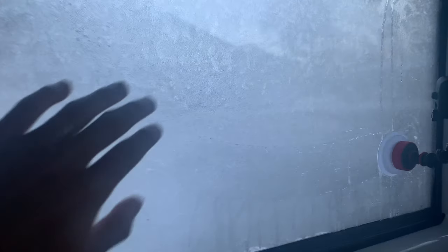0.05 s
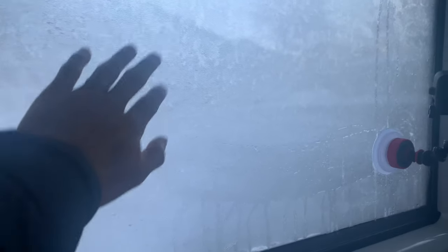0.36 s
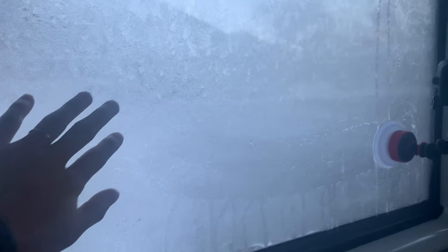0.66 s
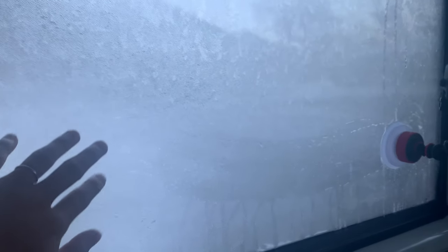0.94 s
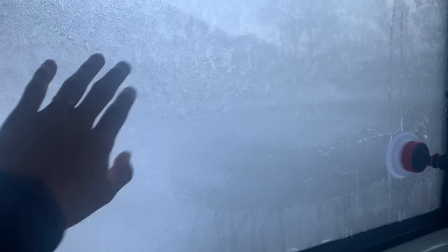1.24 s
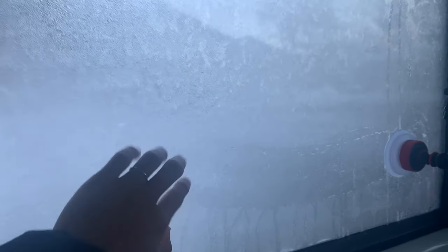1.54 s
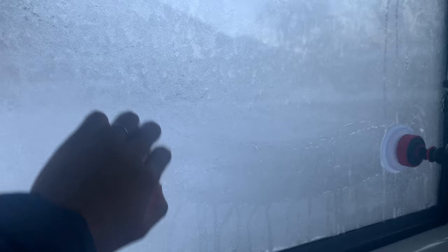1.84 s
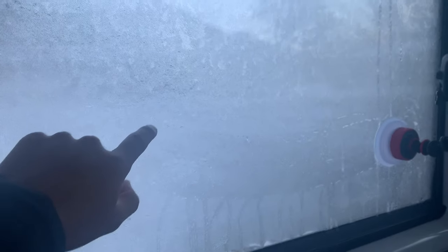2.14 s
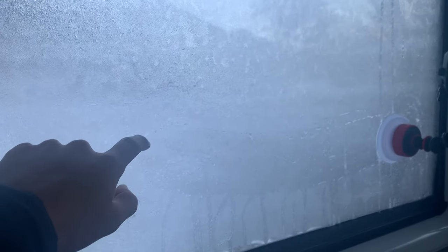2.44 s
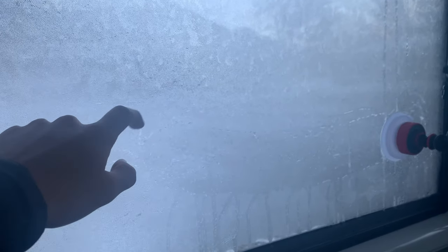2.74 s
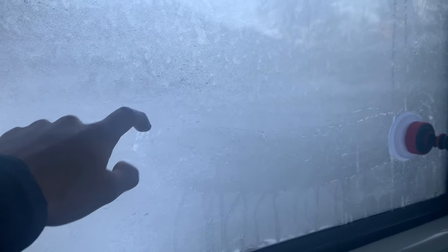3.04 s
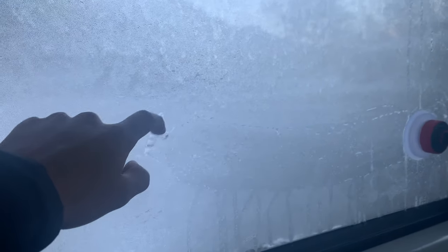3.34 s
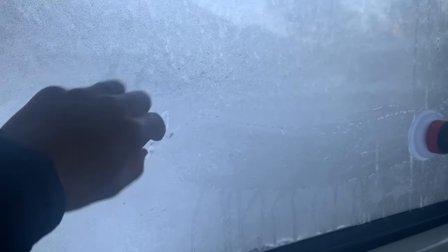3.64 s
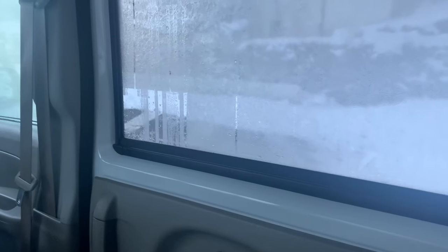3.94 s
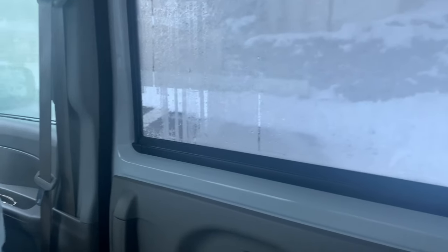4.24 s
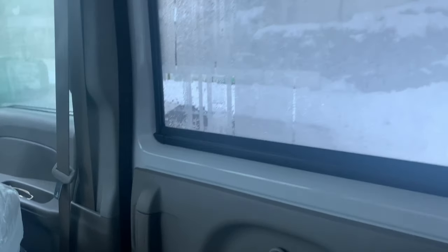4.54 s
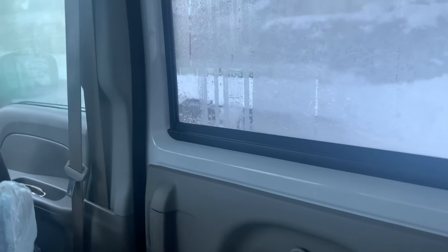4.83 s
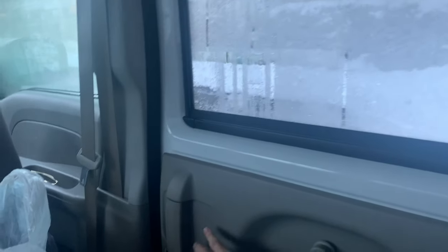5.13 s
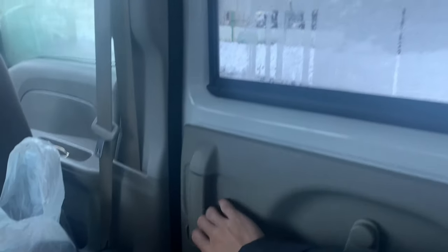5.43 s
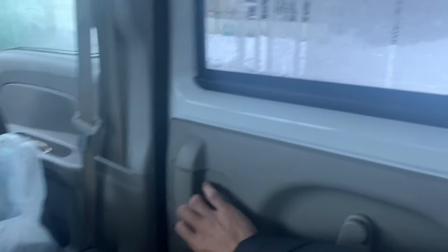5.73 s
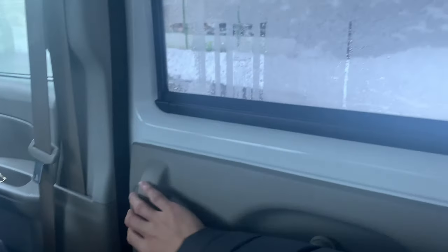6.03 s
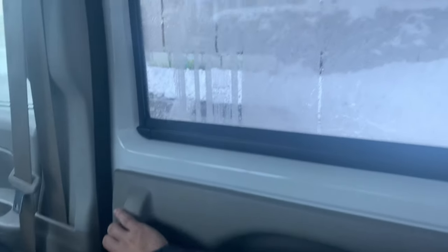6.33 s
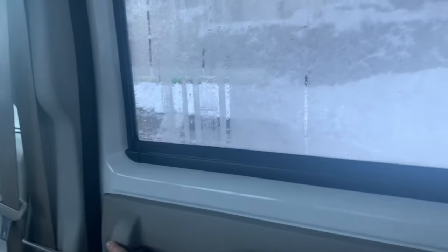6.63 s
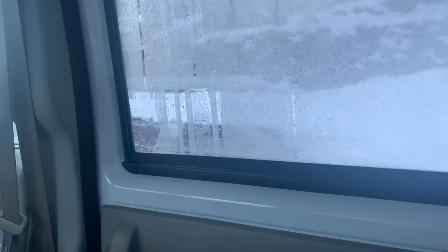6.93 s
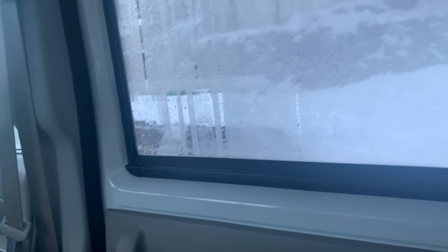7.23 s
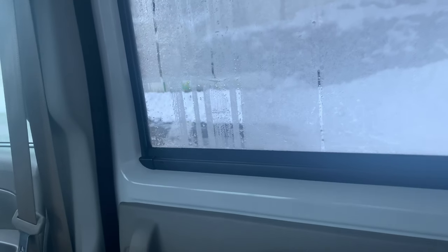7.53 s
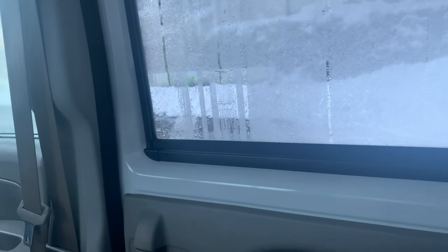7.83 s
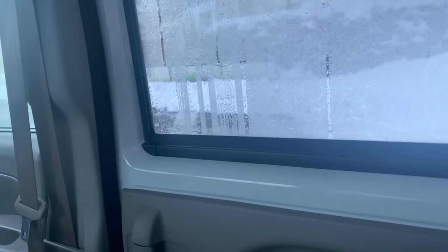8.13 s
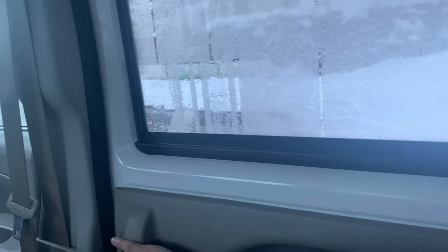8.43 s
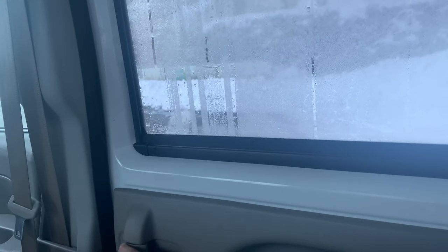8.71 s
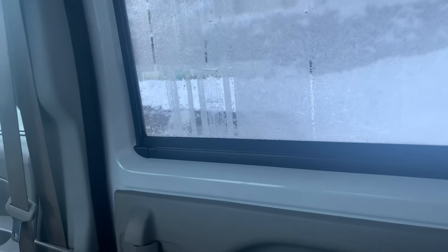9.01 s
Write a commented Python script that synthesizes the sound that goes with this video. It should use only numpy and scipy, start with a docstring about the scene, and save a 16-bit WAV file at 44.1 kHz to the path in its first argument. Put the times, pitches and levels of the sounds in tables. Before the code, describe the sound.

A hand rubs and scratches a frosted van window, a sleeve swishes, then a latch clicks and the sliding door thumps open.

```python
"""A faint sleeve swish, then a hand pats, rubs and knocks the frosted side window inside a parked van.
A fingernail scratches the ice; the breaking crystals ring the pane. The nylon sleeve swishes again as
the arm moves to the door, and fingers drag over the trim and fumble with the lock and handle.
The latch lets go; the sliding door pops out of its seal, booms in the cabin air and starts to roll."""
import sys
import numpy as np
from scipy import signal
from scipy.fft import rfft, irfft, next_fast_len
from scipy.io import wavfile
from scipy.ndimage import uniform_filter1d

SR = 44100
rng = np.random.default_rng(int(sys.argv[2]) if len(sys.argv) > 2 else 0)


def output_pcm(signal):
    """Save a mono or channel-first signal as 16-bit PCM at the path in sys.argv[1].

    Samples are clipped to [-1, 1] before scaling.
    """
    pcm = np.clip(np.atleast_2d(signal).T, -1, 1) * 32767
    wavfile.write(sys.argv[1], SR, np.round(pcm).astype(np.int16))


N = 408807
TIME_S = np.arange(N) / SR
RING_S = TIME_S[:SR // 2]
IMPULSE_GAIN = np.sqrt(SR / 50)  # unit energy to rms 1 over 20 ms


def undb(db):
    """Decibels to gain."""
    return 10 ** (np.asarray(db) / 20)


def unit_rms(x):
    """Scale to rms 1."""
    return x / np.sqrt(np.mean(x ** 2) + 1e-30)


def unit_energy(x):
    """Scale to energy 1."""
    return x / np.sqrt(np.sum(x ** 2) + 1e-30)


def band(x, lo_hz, hi_hz):
    """Causal band-pass."""
    sos = signal.butter(3, [lo_hz, min(hi_hz, SR / 2 - 1)], "band", fs=SR, output="sos")
    return signal.sosfilt(sos, x)


def colour(x, spectrum):
    """Filter by (frequency [Hz], gain [dB]) points."""
    hz, db = np.transpose(spectrum)
    size = next_fast_len(len(x))
    bins_hz = np.maximum(np.arange(size // 2 + 1) * SR / size, 1)
    gain = undb(np.interp(np.log(bins_hz), np.log(hz), db))
    return irfft(rfft(x, size) * gain, size)[:len(x)]


def envelope(table, column):
    """Smoothed gain along one level column; silent before the first row."""
    times_s, *levels_db = np.transpose(table)
    gain = undb(np.interp(TIME_S, times_s, levels_db[column])) * (TIME_S >= times_s[0])
    return uniform_filter1d(gain, SR // 300)


def strokes(table, swell_db, attack_s, release_s, treble=False):
    """Stroke gain: touch down, swell, slow, lift off. treble adds each row's offset."""
    out = np.zeros(N)
    for start_s, rise_s, length_s, level_db, *offset_db in table:
        if treble:
            level_db += offset_db[0]
        t = TIME_S[TIME_S < length_s + 8 * release_s]
        speed_db = np.interp(t, [0, min(rise_s, length_s), length_s], [-swell_db, 0, -swell_db])
        contact = np.minimum(t / attack_s, 1) * np.exp(-np.maximum(t - length_s, 0) / release_s)
        add(out, start_s, contact * undb(level_db + speed_db))
    return out


def wander(rate_hz):
    """Ramps between random values, rms 1."""
    hold = max(int(SR / rate_hz), 1)
    steps = np.repeat(rng.standard_normal(N // hold + 1), hold)
    return unit_rms(uniform_filter1d(steps, hold)[:N])


def grains(rate_hz, spread_db):
    """Tiny impulses of random time, size and sign."""
    size = undb(spread_db * np.minimum(rng.exponential(size=N), 5))
    fires = rng.random(N) < rate_hz / SR
    return unit_rms(fires * size * rng.choice([-1, 1], N))


def modes(table):
    """Impulse response of damped modes."""
    response = np.zeros(len(RING_S))
    for k, (hz, width_hz, db) in enumerate(table):
        decay = np.sqrt(width_hz) * np.exp(-np.pi * width_hz * RING_S)
        response += (-1) ** k * undb(db) * decay * np.sin(2 * np.pi * hz * RING_S)
    return unit_energy(response)


def tail(lo_hz, hi_hz, t60_s):
    """Impulse response of dense modes in one band."""
    noise = rng.standard_normal(len(RING_S)) * undb(-60 * RING_S / t60_s)
    return unit_energy(band(noise, lo_hz, hi_hz))


def ring(force, response):
    """Drive a body with a force."""
    return signal.oaconvolve(force, response)[:len(force)]


def add(out, start_s, sound):
    """Mix a sound in at a time."""
    i = int(start_s * SR)
    out[i:i + len(sound)] += sound[:N - i]


def taps(table):
    """One impulse per (time [s], level [dB]) row."""
    out = np.zeros(N)
    for time_s, db in table:
        out[int(time_s * SR)] += undb(db) * IMPULSE_GAIN
    return out


# jolts out of the seal and along the track: (time [s], level [dB])
DOOR_JOLTS = [(8.839, -30), (8.9105, -35), (9.054, -37)]
# cabin air modes: (frequency [Hz], width [Hz], gain [dB])
CABIN_AIR_MODES = [(42, 12, -6), (55, 13, -25), (67, 10.7, 21)]
# door travel: (time [s], rumble [dB], rollers [dB])
ROLL_LEVELS = [(8.79, -58, -62), (8.83, -43.5, -54), (8.98, -51.5, -53.5), (9.166, -52.5, -60),
               (9.27, -50.5, -59)]
# track noise: (frequency [Hz], gain [dB])
ROLL_SPECTRUM = [(18, -35), (30, 2.5), (138, -0.5), (355, -15), (526, -11), (889, -21), (962, -17),
                 (1670, -29.5), (6720, -41.5), (8300, -41), (10200, -46), (12600, -40), (16000, -47)]
def sliding_door():
    """The door pushes the cabin air into a boom, then its rollers rumble on the track."""
    seal = np.hanning(int(0.0074 * SR))  # rubber softens each jolt
    push = ring(taps(DOOR_JOLTS), seal / seal.sum())
    boom = ring(push, modes(CABIN_AIR_MODES)) * undb(5.5)
    track = colour(grains(rate_hz=3200, spread_db=0), ROLL_SPECTRUM)
    rumble = unit_rms(band(track, 35, 360)) * envelope(ROLL_LEVELS, column=0) * undb(5)
    rollers = unit_rms(band(track, 630, 16000)) * envelope(ROLL_LEVELS, column=1)
    return boom + rumble + rollers * undb(2 + 4 * wander(50))


# lock, handle and latch contacts: (time [s], length [s], level [dB], hardness [dB], panel push [dB])
LATCH_CONTACTS = [(5.234, 0.0081, -56, -6.5, 5), (5.309, 0.018, -62.5, 1.5, 3.5),
                  (5.404, .005, -52, 0.5, 3.5), (5.483, 0.011, -56.5, -0.5, -1.5),
                  (5.519, .01, -58.5, -5.5, 3), (5.86, 0.013, -53.5, -5, -2), (5.878, .019, -57.5, 8, 1),
                  (5.935, 0.0056, -55, 7.5, 4.5), (6.196, 0.027, -45, -15, -17),
                  (6.61, .006, -62, -27, 2.5), (6.672, 0.013, -60, -3, 0.5),
                  (6.695, 0.0053, -51, -3.5, 0.5), (7.033, 0.0023, -68.5, 11, 8),
                  (7.088, 0.013, -48, -19, -1), (7.157, 0.0075, -55, -1.5, 4),
                  (7.387, 0.0069, -50, -2.5, 2), (7.745, 0.0014, -90.5, 22, -12),
                  (7.794, 0.012, -69.5, -9, 12.5), (7.835, 0.016, -57.5, -11, 6),
                  (7.8597, 0.0027, -43, 1, 1.5), (8.081, 0.019, -44, -7, -7),
                  (8.115, 0.0042, -43, -10, -19), (8.123, 0.0058, -38.5, -6.5, 0),
                  (8.143, 0.0028, -57, -3, 3), (8.238, 0.005, -62, -9, 9), (8.386, 0.0057, -66, 2.5, 5.5),
                  (8.541, 0.013, -47.5, -13, -20), (8.557, 0.021, -41, -10.5, -16),
                  (8.578, 0.015, -37.5, -10, -20), (8.602, 0.0052, -43.5, -8, -5),
                  (8.62, .011, -34.5, -7, -25), (8.647, 0.0067, -47, -7, 1),
                  (8.678, 0.00445, -47, -6.5, 4.5), (8.782, 0.047, -48, -9, 9.5),
                  (8.827, 0.0122, -35.5, -16.5, 6.5), (8.853, 0.0053, -48, -7, -11),
                  (8.938, 0.0099, -39.5, -11.5, -0.5), (8.959, 0.014, -48, 0, -5),
                  (8.97, 0.00495, -45.5, 1.5, -5), (9.001, 0.00515, -35.5, -24, -11),
                  (9.017, 0.022, -43, -16, 0.5), (9.059, 0.0032, -64, 4, 10.5),
                  (9.172, 0.0019, -64.5, 2.5, 1), (9.233, 0.0097, -54, -17, -5)]
# latch, lever and trim panel modes: (frequency [Hz], width [Hz], gain [dB])
LATCH_BODY_MODES = [(663, 50, 2), (730, 60, 4), (911, 32, 0), (1088, 35, -2), (1193, 45, 0), (1292, 45, -3),
                    (1453, 30, -1), (1558, 38, 0), (1814, 55, 1), (1898, 30, -3), (2137, 35, -8),
                    (2229, 32, -10), (2390, 55, -8)]
LATCH_LEVER_MODES = [(2810, 76, 0), (3120, 90, 0), (3750, 90, 1), (4060, 110, -2), (4693, 60, -3),
                     (5200, 110, 0), (6000, 120, -1), (7460, 70, -2), (8550, 110, -5)]
TRIM_PANEL_MODES = [(87, 10, -6), (122, 14, -3), (150, 16, 2), (176, 16, 2), (240, 12, -6), (335, 22, -5),
                    (399, 18, -3)]
def latch():
    """Each contact chatters, ringing the trim panel, the latch, its levers and their hard edges."""
    trim, steel, lever = modes(TRIM_PANEL_MODES), modes(LATCH_BODY_MODES), modes(LATCH_LEVER_MODES)
    out = np.zeros(N)
    for time_s, length_s, level_db, hardness_db, push_db in LATCH_CONTACTS:
        n = int(length_s * SR)
        chatter = rng.standard_normal(len(RING_S)) ** 3
        chatter[:n] *= signal.windows.tukey(n, 0.3)
        chatter[n:] = 0
        # strong modes, dense ring, faint cabin echo
        panel = trim + tail(43, 516, t60_s=0.33)
        clack = steel + undb(-3.5) * tail(590, 2780, t60_s=0.06) + undb(-2) * tail(487, 1350, t60_s=0.16)
        click = undb(-4) * lever + tail(2580, 8050, t60_s=0.015)
        click += undb(-4.5) * tail(2100, 7200, t60_s=0.12)
        tick = tail(8400, 16000, t60_s=0.011) + undb(-7) * tail(8000, 14000, t60_s=0.07)
        tick_db = -7.5 + 1.39 * hardness_db - 3 * np.log2(length_s / 0.005)  # hard and short ticks most
        for body, part_db in ((panel, push_db), (clack, 0), (click, hardness_db), (tick, tick_db)):
            add(out, time_s, unit_energy(ring(chatter, body)) * IMPULSE_GAIN * undb(level_db + part_db))
    return out


# glass modes and slow bending modes in the frame: (frequency [Hz], width [Hz], gain [dB])
PANE_MODES = [(345, 20, 6), (378, 18, 6), (467, 22, -3), (695, 45, -3), (786, 30, -5), (907, 25, -5),
              (987, 28, 0), (1076, 28, -5), (1197, 25, -7), (1353, 28, -5), (1481, 25, -9), (1590, 40, -12),
              (1750, 45, -10), (1900, 45, -13), (2120, 50, -13), (2340, 60, -12), (2470, 90, -9),
              (2765, 40, -14), (3050, 40, -13), (3410, 40, -5), (3480, 40, -7), (3800, 70, -12),
              (4000, 35, -9), (4185, 40, -2), (4470, 60, -11), (5020, 60, -8), (5320, 40, -14),
              (5520, 60, -14), (5940, 45, -12), (6230, 120, -12), (7190, 90, -17), (7750, 130, -17),
              (8090, 40, -17), (8700, 70, -17)]
FLEX_MODES = [(40.4, 4.7, -2), (54.5, 1.6, 0), (81.6, 5.2, 8), (125, 10, 2), (147.4, 6, -3)]
# hand landing on the pane: (time [s], level [dB])
HAND_PATS = [(0.513, -40), (0.566, -48), (1.284, -39)]
# light knocks on the glass, then a faint handling bump: (time [s], level [dB])
LIGHT_KNOCKS = [(1.962, -55), (1.976, -62), (1.997, -58), (2.012, -60), (2.846, -51.5), (3.505, -54.5),
                (3.85, -64.5)]
def pats_and_knocks():
    """Pats bend the pane; light knocks ring the glass, then comes a faint handling bump."""
    pats = ring(taps(HAND_PATS), modes(FLEX_MODES)) * undb(-10)
    pane = undb(-0.5) * modes(FLEX_MODES[2:])
    pane += undb(0.5) * modes(PANE_MODES[:3]) + undb(-7) * modes(PANE_MODES[3:11])
    return pats + ring(taps(LIGHT_KNOCKS), pane)


def frost_rub(force, speed, pressure, spectrum, hiss_db, body_db, crisp_db, ring_db):
    """Breaking frost rings the pane; a light touch is crisp, pressed flesh muffles the top."""
    direct = unit_rms(colour(force, spectrum))
    glass = undb(ring_db) * unit_rms(ring(force, modes(PANE_MODES)))
    dense_ring = unit_rms(colour(ring(force, tail(1500, 17000, t60_s=0.025)), spectrum))
    treble = direct + glass + undb(-6) * dense_ring
    lightness = speed / (speed + pressure + 1e-12)
    body = unit_rms(band(direct + glass, 200, 1800)) * pressure
    hiss = unit_rms(band(treble, 1600, 9000)) * speed
    crisp = unit_rms(band(treble, 9000, 16500)) * speed * lightness
    return undb(body_db) * body + undb(hiss_db) * hiss + undb(crisp_db) * crisp


# scratches: (time [s], rise [s], length [s], level [dB], hiss offset [dB])
NAIL_STROKES = [(1.944, 0.05, 0.07, -53, -5.5), (2.555, 0.031, 0.084, -53, -4.5),
                (2.657, 0.079, 0.1, -51, 1.5), (2.775, 0.057, .066, -56.5, -3.5),
                (2.832, 0.025, 0.1, -48.5, -0.5), (3.001, 0.051, 0.062, -51.5, 3),
                (3.139, .03, 0.072, -54.5, 0.5), (3.202, 0.029, 0.048, -55, -4.5),
                (3.293, 0.034, 0.067, -52.5, 5.5), (3.433, 0.013, 0.07, -64, 1),
                (3.477, 0.041, 0.056, -56.5, -3.5), (3.587, 0.035, 0.093, -62, -2),
                (3.76, 0.009, 0.04, -56.5, -2.5)]
# nail on ice: (frequency [Hz], gain [dB])
NAIL_SPECTRUM = [(88, -42), (150, -6), (275, 3.5), (361, -11), (545, 3), (979, -3.5), (1190, -5.5),
                 (2140, -18), (2500, -14), (2700, -10.5), (4320, -11), (6770, -16), (7920, -20.5),
                 (10500, -34.5), (16000, -32.5)]
# catches on ice ridges: (time [s], level [dB])
NAIL_SNAGS = [(1.9948, -62), (2.013, -61), (2.5691, -52.5), (2.5885, -54), (2.6274, -60), (3.315, -55.5),
              (3.605, -59.5), (3.623, -56), (3.7686, -57.5), (3.7837, -65)]
def nail_scratch():
    """The nail sticks and slips through coarse crystals, flexes the pane and snags on ridges."""
    speed = strokes(NAIL_STROKES, swell_db=10.5, attack_s=0.016, release_s=0.018, treble=True)
    pressure = strokes(NAIL_STROKES, swell_db=8, attack_s=0.016, release_s=0.029)
    slips = grains(rate_hz=3500, spread_db=2.8) * undb(2.8 * wander(230))
    scrape = frost_rub(slips, speed, pressure, NAIL_SPECTRUM,
                       hiss_db=-0.5, body_db=-0.5, crisp_db=-0.5, ring_db=0)
    flex = undb(-8.5) * modes(FLEX_MODES[1:]) + undb(-5) * tail(87, 196, t60_s=0.3)
    snag = undb(-10) * tail(2400, 13600, t60_s=0.011)
    snag += undb(-9.5) * unit_energy(band(modes(PANE_MODES), 3900, 10000))
    return scrape + ring(slips * pressure, flex) + ring(taps(NAIL_SNAGS), snag)


# rubs: (time [s], rise [s], length [s], level [dB], hiss offset [dB])
PALM_STROKES = [(0.508, 0.0042, .24, -69.5, 0), (0.76, 0.21, 0.3, -67, 0.5), (1.2, 0.058, 0.15, -77, 1),
                (1.27, .015, 0.27, -71.5, 6), (1.36, 0.093, 0.22, -62.5, 8), (1.57, .01, 0.11, -76.5, 1.5),
                (1.715, 0.021, 0.17, -81, 1.5), (1.817, 0.041, 0.11, -57.5, -3.5),
                (2.325, 0.048, 0.11, -59, -10)]
# palm on frost: (frequency [Hz], gain [dB])
PALM_SPECTRUM = [(88, -14), (150, 15), (254, -1), (297, -3.5), (354, 2), (422, -47.5), (457, 6), (589, -1),
                 (790, 2), (1360, -3), (2060, -15.5), (2600, -10), (3420, -10.5), (3700, -8),
                 (10000, -19.5), (16000, -19)]
def palm_rub():
    """A soft palm breaks many fine crystals; its weight lifts more slowly than the scraping stops."""
    speed = strokes(PALM_STROKES, swell_db=10.5, attack_s=0.0047, release_s=0.012, treble=True)
    pressure = strokes(PALM_STROKES, swell_db=9.5, attack_s=0.0047, release_s=0.029)
    crystals = grains(rate_hz=10000, spread_db=-0.5) * undb(wander(90))
    return frost_rub(crystals, speed, pressure, PALM_SPECTRUM,
                     hiss_db=1, body_db=1.5, crisp_db=-6, ring_db=-6)


# arm moves: (time [s], rise [s], length [s], level [dB], sheen offset [dB])
SLEEVE_STROKES = [(0.0, 0.14, .45, -65.5, -2), (3.835, 1.2, 1.58, -62.5, -3.5), (5.26, 0.51, 0.97, -57, -6),
                  (6.24, 0.19, 0.34, -58, -4.5), (6.64, 0.23, 0.44, -65.5, -5.5),
                  (7.0, 0.13, .43, -62, -3.5), (7.44, 0.17, 0.35, -63, -6.5), (7.86, 0.19, .3, -64, -9.5),
                  (8.235, 0.22, .28, -61, -3), (8.55, .1, 0.29, -64.5, -10.5)]
# sleeve on jacket: (frequency [Hz], gain [dB])
NYLON_SPECTRUM = [(35, -20), (60, 9.5), (79, 0.5), (176, -7), (308, -5.5), (398, -1.5), (540, -6.5),
                  (666, -3.5), (715, -6.5), (1200, -8), (1470, -10.5), (7400, -20.5), (8600, -23),
                  (9400, -29), (10800, -31.5), (13000, -27), (16000, -27.5)]
# weave ribs crossing: (time [s], length [s], start rate [Hz], end rate [Hz], level [dB])
WEAVE_ZIPS = [(0.09, 0.12, 11900, 13900, -78), (0.3, 0.13, 13400, 11700, -77),
              (0.39, 0.06, 11800, 11000, -81), (0.45, 0.08, 12900, 11700, -82)]
def sleeve():
    """Nylon fibres slide over each other; on the first quick reach the ribs of the weave zip."""
    shape = dict(swell_db=7, attack_s=0.03, release_s=0.041)
    cloth = colour(grains(rate_hz=16000, spread_db=3), NYLON_SPECTRUM)
    swish = unit_rms(band(cloth, 108, 2400)) * strokes(SLEEVE_STROKES, **shape)
    sheen = unit_rms(band(cloth, 2040, SR / 2)) * strokes(SLEEVE_STROKES, **shape, treble=True)
    out = swish * undb(1.5 + 0.78 * wander(25)) + sheen * undb(-0.5 + 1.44 * wander(44))
    for time_s, length_s, start_hz, end_hz, db in WEAVE_ZIPS:
        n = int(length_s * SR)
        rib_hz = np.linspace(start_hz, end_hz, n) * (1 + 0.021 * wander(2500)[:n])  # uneven ribs
        tone = np.sin(2 * np.pi * np.cumsum(rib_hz) / SR)
        add(out, time_s, tone * np.hanning(n) * undb(db + 5 * wander(74)[:n]))
    return out


# hand over the door trim: (time [s], rise [s], length [s], level [dB])
DRAG_STROKES = [(5.24, 0.32, 0.4, -57.5), (5.8, .17, 0.75, -65.5), (7.05, 0.098, 0.28, -69),
                (7.88, 0.089, .62, -64.5), (8.58, .1, .25, -60)]
def trim_drag():
    """Skin catching on the trim makes the hollow door rumble; loose parts tick faintly."""
    hollow = modes(TRIM_PANEL_MODES) + tail(35, 170, t60_s=0.12)
    catches = grains(rate_hz=1700, spread_db=1)
    rumble = unit_rms(band(ring(catches, hollow), 30, 197))
    rattles = grains(rate_hz=35, spread_db=1)
    ticks = unit_rms(ring(rattles, modes(LATCH_BODY_MODES) + tail(1000, 7800, t60_s=0.032)))
    contact = strokes(DRAG_STROKES, swell_db=1, attack_s=0.02, release_s=0.027)
    return (rumble + undb(-15.5) * ticks) * contact


# still cabin air: (frequency [Hz], gain [dB])
AIR_SPECTRUM = [(18, -29), (30, 1), (319, -11), (384, -9), (473, -17), (801, -18), (2480, -31), (3770, -28),
                (16000, -34)]
def cabin_air():
    """A faint, low hush whose level drifts slightly."""
    hush = unit_rms(colour(rng.standard_normal(N), AIR_SPECTRUM))
    return hush * undb(-81 + 0.7 * wander(3))


def scene():
    """Window, sleeve and door over the cabin air, in mono."""
    window = palm_rub() + nail_scratch() + pats_and_knocks()
    return (window + sleeve() + trim_drag() + latch() + sliding_door() + cabin_air())[None]


def record(dry):
    """The phone thins the deepest bass and cuts the top."""
    low_cut_hz, high_cut_hz = 33, 16100
    thinned = signal.sosfilt(signal.butter(5, low_cut_hz, "high", fs=SR, output="sos"), dry)
    return signal.sosfilt(signal.ellip(10, 0.2, 70, high_cut_hz, fs=SR, output="sos"), thinned)


dry = scene()
out = record(dry)
output_pcm(out)
```